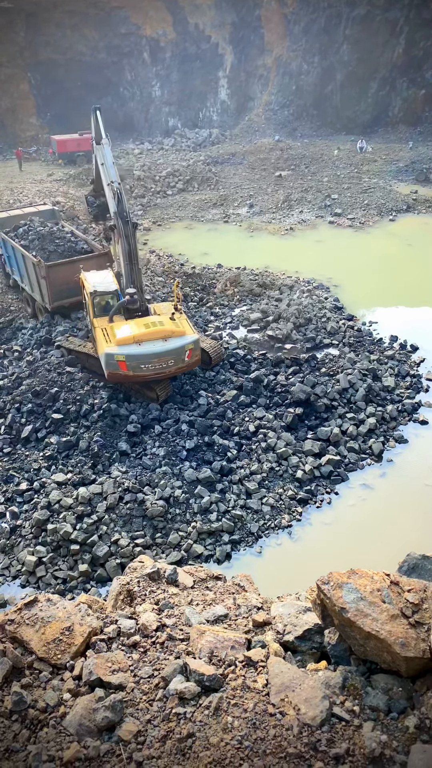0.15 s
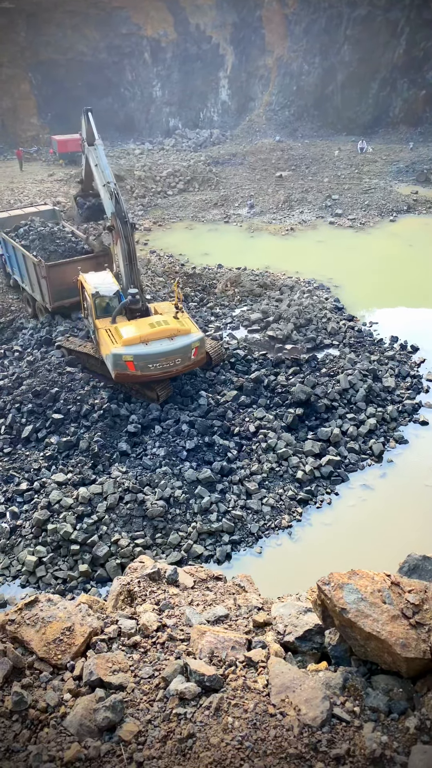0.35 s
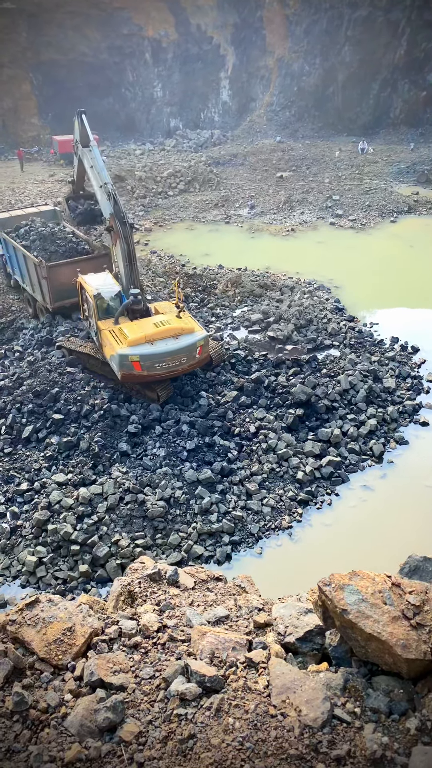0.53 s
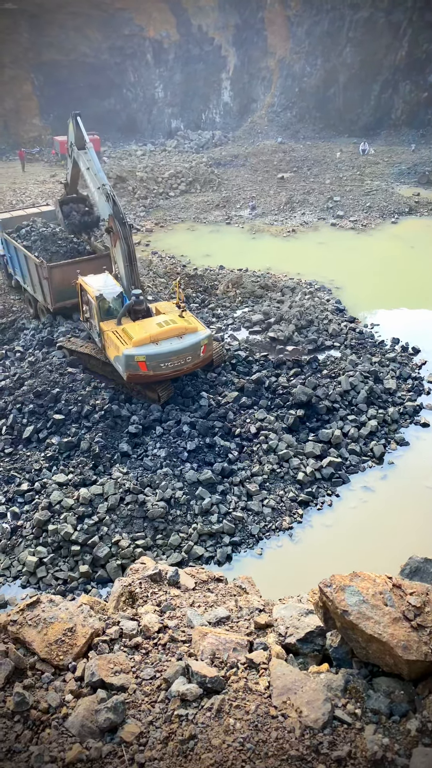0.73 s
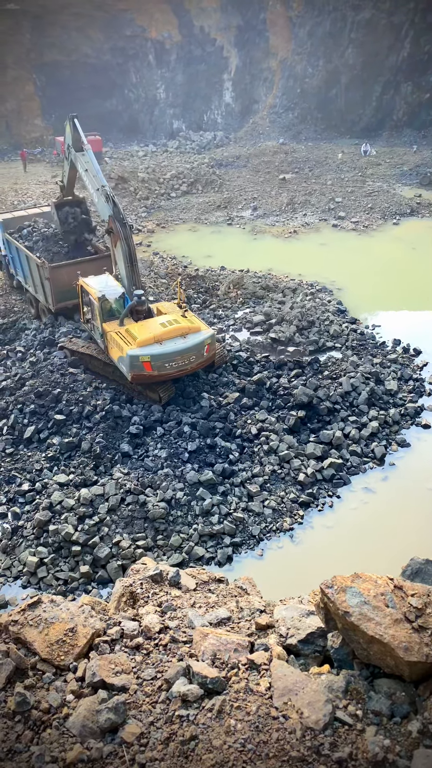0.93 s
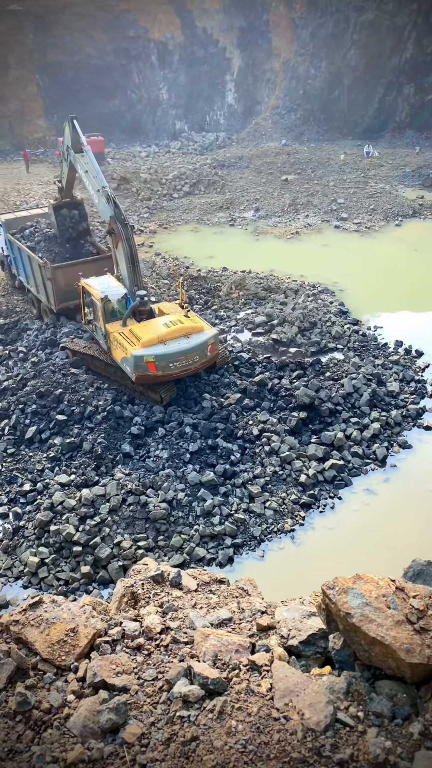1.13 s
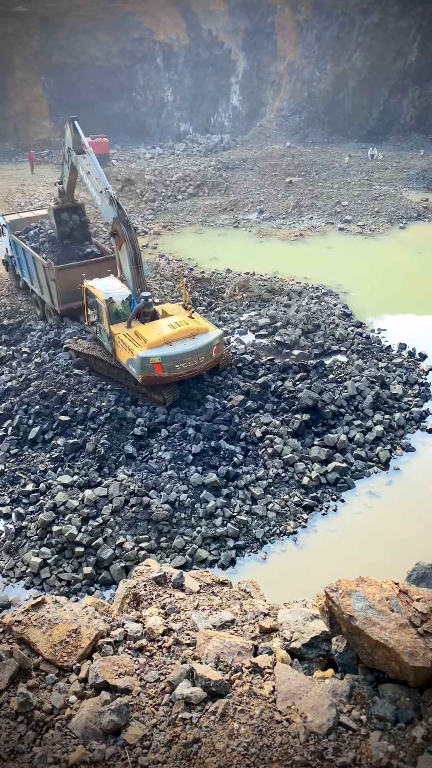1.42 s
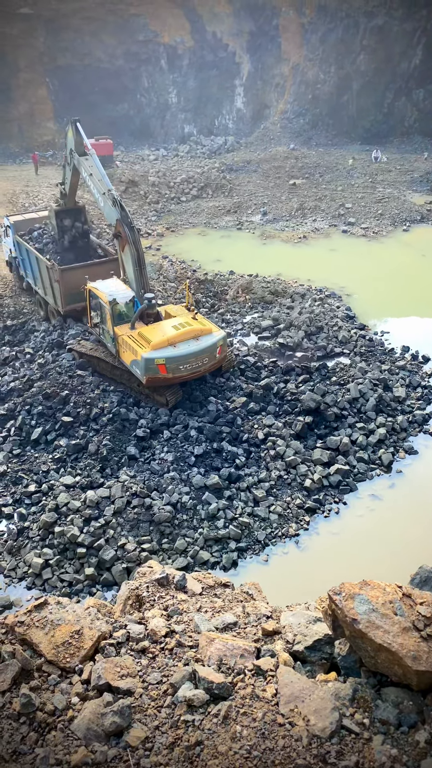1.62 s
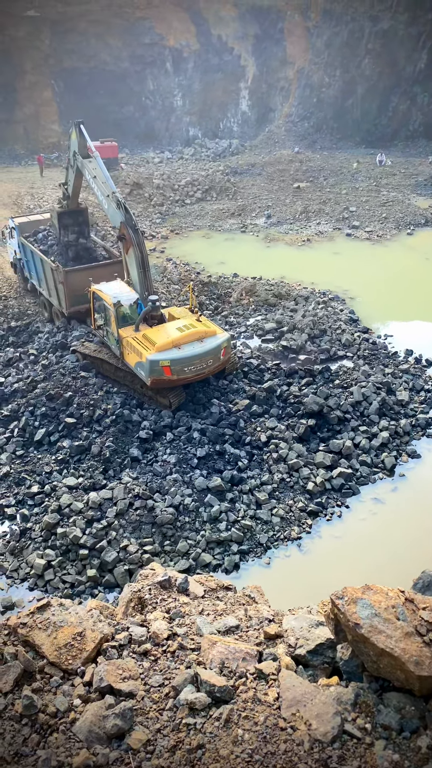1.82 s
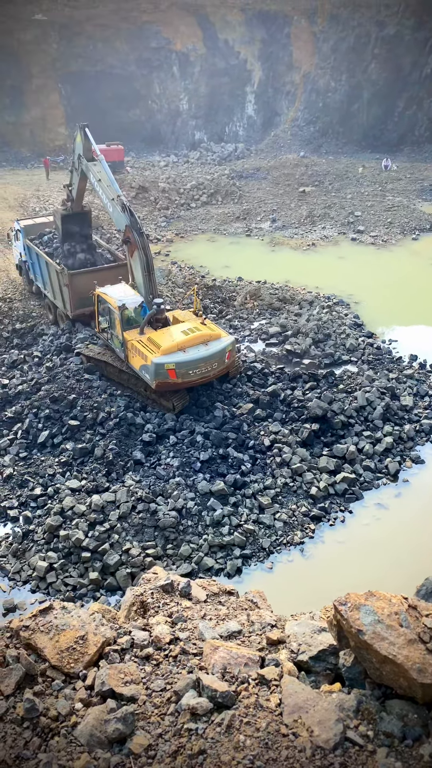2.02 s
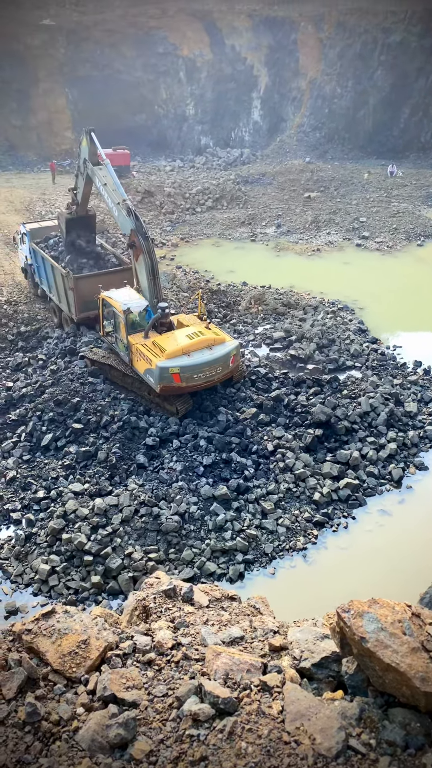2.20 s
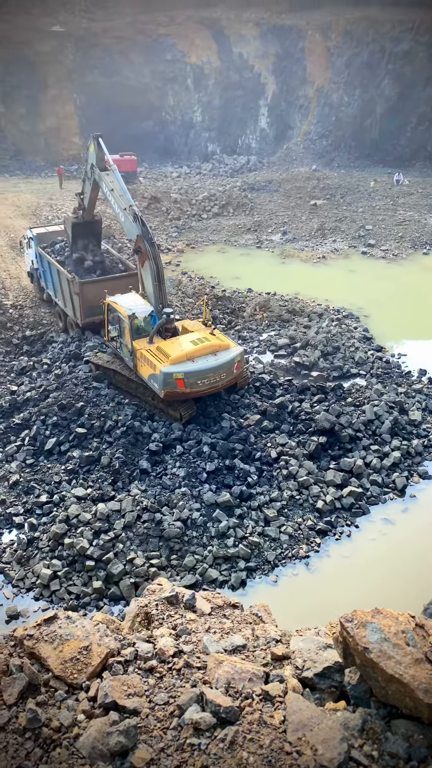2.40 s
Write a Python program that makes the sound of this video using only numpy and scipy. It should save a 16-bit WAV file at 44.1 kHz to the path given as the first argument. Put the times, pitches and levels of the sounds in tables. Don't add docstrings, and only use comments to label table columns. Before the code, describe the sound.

Steady rough engine rumble and hydraulic hiss from an excavator in an open quarry; a few hard knocks on hollow steel, then stones pour in faster with booms and grit, heard at some distance on a phone.

```python
import sys
import numpy as np
from scipy import signal
from scipy.fft import rfft, irfft, next_fast_len
from scipy.io import wavfile
from scipy.ndimage import uniform_filter1d

SR = 44100
rng = np.random.default_rng(int(sys.argv[2]) if len(sys.argv) > 2 else 0)


def master(y):
    cut = np.clip(np.atleast_2d(y).T, -1, 1)
    pcm = np.round(cut * 32767)
    wavfile.write(sys.argv[1], SR, pcm.astype(np.int16))


def to_linear_factor(level_db):
    exponent = np.asarray(level_db, float) / 20
    return 10 ** exponent


N = 112455


def curve(table, x, col=1):
    a = np.array(table, float)
    return np.interp(x, a[:, 0], a[:, col])


def logf(table, hz):
    a = np.array(table, float)
    return np.interp(np.log(hz + 1), np.log(a[:, 0] + 1), a[:, 1])


def level(x, db):
    return x * to_linear_factor(db) / np.sqrt(np.mean(x ** 2))


def band(x, hz, width):
    return signal.lfilter(*signal.iirpeak(hz, hz / width, SR), x)


def wide_band(x, hz, width):
    return band(band(x, hz, width), hz, width)


def walk(rate):
    k = int(SR / rate)
    steps = np.repeat(rng.standard_normal(N // k + 1), k)
    return 1.3 * uniform_filter1d(uniform_filter1d(steps, k), k)[:N]


def sine(hz, t):
    return np.sin(2 * np.pi * hz * t)


def wavering(hz):
    return np.sin(2 * np.pi * np.cumsum(hz) / SR)


def fade(t, t60):
    return np.exp(-np.log(1000) * t / t60)


def add(out, t0, x):
    i = int(t0 * SR)
    out[i:i + len(x)] += x[:max(N - i, 0)]


# [f/Hz, width/Hz, level/dB]
EXHAUST = [(45, 91, -5), (83, 28.3, 6), (186.5, 16.7, -11), (272.6, 43, -2.5), (424, 113, -7),
           (700, 140, -11.5)]
# [f/Hz, level/dB]
WHINES = [(461, -43.5), (1098, -56.5), (4899, -62)]


def engine():
    firing_hz, firing_db = 88.5, -27
    pump = (230.2, -30)  # Hz, dB
    sag_db_s = -1
    turns = np.cumsum(firing_hz * (1 + .025 * walk(5) + .05 * walk(60))) / SR
    size = to_linear_factor(3.56 * rng.standard_normal(N // 100))
    pulses = np.diff(np.floor(turns), prepend=0) * size[turns.astype(int)]
    exhaust = np.zeros(N)
    for k, (hz, width, db) in enumerate(EXHAUST):
        exhaust += (-1) ** k * to_linear_factor(db) * band(pulses, hz, width)
    out = level(exhaust, firing_db)
    for hz, db in [pump, *WHINES]:
        loudness = to_linear_factor(db + 2.5 + 1.03 * walk(8.74) + sag_db_s * np.arange(N) / SR)
        out += loudness * wavering(hz * (1 + 0.00607 * walk(6)))
    return out


# [f/Hz, level/dB per Hz]
DRONE = [(30, -11.5), (55, -0.5), (250, -7), (550, -20), (2300, -20.5), (4400, -31), (9500, -38),
         (15000, -60.5)]


def drone():
    load_db_s, load_hz = 1.35, 1500
    out, swell = 0, walk(6.76)
    for hz in 28 * 2 ** (np.arange(28) / 3.02):
        db = logf(DRONE, hz) + 0.12 * swell + 0.5 * walk(13.72)
        if hz > load_hz:
            db = db + load_db_s * (np.arange(N) / SR - 1.5)
        out = out + to_linear_factor(db) * wide_band(rng.standard_normal(N), hz, hz / 3)
    return level(out, -23.5)


def hydraulics():
    swing_hz, swing_db, swing_fade_db_s = 703, -36, -16
    valve_s, valve_width_s, valve_db = 1.268, 0.087, -36.5
    t = np.arange(N) / SR
    loudness = to_linear_factor(swing_db + swing_fade_db_s * t + 2.5 * walk(29))
    tone = loudness * wavering(swing_hz * (1 + 0.006 * walk(31)))
    hiss = level(band(rng.standard_normal(N), 2700, 3700), valve_db)
    return tone + hiss * np.exp(-((t - valve_s) / valve_width_s) ** 2)


# [t/s, level/dB]
SLIDE = [
    (0, -39),
    (1.15, -35),
    (1.5, -25.5),
    (1.9, -22.5),
    (2.15, -21),
    (2.38, -24.5),
    (2.44, -23),
    (2.475, -14.5),
    (2.55, -21),
]


def slide():
    grains_per_s, middle_hz, scatter_db = 900, 600, 1.5
    out = np.zeros(N)
    for when, v, w, s in rng.random((int(grains_per_s * 2.55), 4)):
        spread = v + s - 1
        hz = middle_hz * 2 ** (2.4 * max(spread, .6 * spread))
        t = np.arange(int(SR * 5 / hz)) / SR
        size = to_linear_factor(-scatter_db * np.log(w + 0.11) - 1.4 * np.log2(hz / middle_hz))
        add(out, when * N / SR, size * fade(t, 5.35 / hz) * sine(hz, t))
    return level(out, -3) * to_linear_factor(curve(SLIDE, np.arange(N) / SR))


# [t/s, level/dB, f/Hz]
THUDS = [(0.1, -20, 220), (0.024, -13, 238), (1.802, -12.5, 450), (0.37, -6, 350), (0.38, -7, 265),
         (0.46, -17, 210), (0.45, -11.5, 294), (0.49, -11, 250), (0.899, -14, 88), (1.941, -10.5, 374),
         (2.09, -11, 256), (1.995, -16, 222), (2.035, -16, 203), (2.065, -11.5, 175), (1.87, -17, 160),
         (1.78, -14.5, 144), (1.96, -14, 170), (2.455, -12, 166), (0.11, -12, 236), (0.2, -16.5, 239),
         (2.16, -11, 260), (2.2, -13.5, 173), (2.401, -13.5, 230), (2.436, -13, 260), (2.47, -5, 300),
         (2.505, -9.5, 168), (1.585, -13.5, 224), (2.268, -11.5, 254)]
# [t/s, level/dB, f/Hz]
CONTACTS = [(0.352, -18, 1077), (0.356, -20, 1980), (2.497, -17, 2260), (2.512, -16.5, 1880),
            (1.512, -17, 667), (2.07, -17.5, 1590), (0.336, -22.5, 4940), (0.344, -33, 1940),
            (0.854, -18, 2950), (0.8578, -14.5, 1880), (0.858, -18, 3000), (0.858, -20, 916),
            (0.864, -30, 2560), (1.441, -24, 1780), (2.453, -23, 2620), (2.486, -8, 764), (2.487, -18, 1760),
            (2.471, -15, 1385)]
# [t/s, level/dB, f/Hz]
BANGS = [(0.3354, -8, 1100), (0.3354, -10, 1950), (0.3358, -13, 1500), (0.3355, -14, 750), (0.342, -8, 220),
         (0.345, -12, 170), (0.174, -15, 700), (0.1745, -17, 570), (0.343, -15, 1950), (0.3445, -16, 1150),
         (0.338, -15, 1500), (1.3943, -14, 2050), (1.3946, -18, 1700), (1.3946, -18, 2450),
         (1.408, -20, 2050), (1.4415, -19, 1850), (2.452, -19, 2300), (2.461, -18, 1700)]


def thuds_and_pings():
    out, t = np.zeros(N), np.arange(SR // 2) / SR
    for t0, db, hz in [*THUDS, *CONTACTS, *BANGS]:
        onset = np.minimum(t * hz / 1.1, 1)
        add(out, t0, to_linear_factor(db) * onset * fade(t, 14 / hz + 0.027) * sine(hz, t))
    return out


# [t/s, level/dB, f/Hz, t60/s]
GRIT = [(0.1725, -42, 9900, .05), (0.3346, -42, 10550, .1), (1.04, -40, 9700, .05),
        (1.6496, -37, 11000, .06), (1.8677, -39, 9800, .05), (1.9131, -39, 9070, .04),
        (2.0822, -40, 9100, .04), (2.2388, -41.5, 9500, 0.12), (2.4538, -35, 10000, .05),
        (0.3352, -28.5, 4300, 0.15), (0.344, -19, 1900, 0.082), (0.853, -21, 2800, 0.16),
        (0.862, -35, 5200, 0.1), (1.3952, -30, 2200, .06), (0.7243, -32, 2930, 0.088),
        (1.0457, -26.5, 2400, 0.087), (1.0755, -28, 2600, 0.08), (1.1892, -28, 2290, 0.066),
        (1.5834, -34, 2300, 0.054), (1.9799, -30, 2600, 0.067), (2.2523, -25.5, 2700, 0.072),
        (2.3022, -28, 2600, 0.13), (2.3545, -26, 2410, 0.068), (2.41, -29.5, 3800, .1),
        (0.174, -32, 620, 0.066), (2.458, -25, 2600, 0.18), (2.487, -24, 2500, .2), (0.866, -30, 3550, .15),
        (0.337, -18, 750, 0.083), (1.942, -27, 700, .08)]


def grit():
    out, t = np.zeros(N), np.arange(SR // 4) / SR
    for t0, db, hz, t60 in GRIT:
        noise = rng.standard_normal(len(t))
        spray = wide_band(noise, hz, 0.51 * hz)
        add(out, t0, level(spray, db) * fade(t, t60))
    return out


# [t/s, crack level/dB, stone f/Hz, bed boom relative level/dB, bright clatter relative level/dB]
KNOCKS = [(0.175,-25,715,-9,-31), (0.336,-8,1270,-0.5,-8.5), (0.413,-14.5,501,-7.5,-7),
          (0.852,-15.5,1920,-17,-17), (0.857,-11,1350,-11,-1.5), (0.931,-18,640,-14,1),
          (1.317,-15,1170,-34,-13), (1.3956,-13.5,1920,-18,-9.5), (1.442,-19.5,1800,-16,-12),
          (1.509,-11.5,650,-25,-11), (1.577,-13,940,-14,-13), (1.72,-14.5,600,-6,-25),
          (1.764,-15,845,-10,-11), (1.866,-15,650,-10,-8.5), (1.945,-9.5,620,-5.5,-14),
          (2.047,-13.5,556,-4.5,-7), (2.073,-14,620,-9,-13), (2.135,-13.5,577,-16,-14),
          (2.16,-13.5,760,-19,-12), (2.239,-13.5,905,-27,-13), (2.285,-11.5,720,-12,-9.5),
          (2.452,-13.5,1050,-5.5,-2.5), (2.486,-9.5,880,-5.5,-12.5), (2.502,-11.5,900,-10,-16)]
# [f/Hz, level/dB, t60/s]
BED = [(83.5, 2, 0.3), (122, 3, 0.056), (187, -0.5, 0.088), (234.7, -3.5, 0.27), (263.3, 1, 0.36),
       (324, -5, 0.12), (388, 1, 0.2), (685, -6.5, 0.067), (1118, -14, 0.1)]


def bed_ring(t):
    out = np.zeros(len(t))
    for hz, db, t60 in BED:
        a, b = rng.standard_normal(2)
        tone = np.sin(2 * np.pi * hz * (1 + 0.021 * b) * t + 3 * b)
        out += to_linear_factor(db + 1.7 * a) * fade(t, t60) * tone
    return out


def knocks():
    crack_t60_s, bed_late_s = .03, .006
    rattle_db, rattle_hold_s, rattle_t60_s = -6, .032, .12
    hard_db, rattle_per_db = 1, 0.31
    out, t = np.zeros(N), np.arange(SR // 2) / SR
    rattle_fade = fade(np.maximum(t - rattle_hold_s, 0), rattle_t60_s)
    for t0, db, hz, boom_db, bright_db in KNOCKS:
        noise = rng.standard_normal((3, len(t)))
        rattle = to_linear_factor(rattle_db + rattle_per_db * min(db - hard_db, 0)) * rattle_fade
        shape = np.minimum(t * hz / 1.6, 1) * (fade(t, crack_t60_s) + rattle)
        stone = level(wide_band(noise[0], hz, 0.88 * hz), 0)
        clatter = level(wide_band(noise[1], 2280, 2000), 0)
        clatter = clatter + level(band(noise[2], 6000, 2200), -12)
        add(out, t0 - .001, to_linear_factor(db - 9.5) * (stone + to_linear_factor(bright_db + 5) * clatter) * shape)
        boom = bed_ring(t) * np.minimum(t / 0.0021, 1)
        add(out, t0 + bed_late_s, to_linear_factor(db + boom_db - 4.5) * boom)
    return out


# [t/s, level/dB, f/Hz]
SHOVES = [(1.476, -8, 56), (1.52, -10.5, 61.5), (1.638, -8, 67), (1.708, -5, 85), (0.41, -6, 83),
          (1.29, -12, 55), (0.35, -13, 115), (0.839, -17, 85.5), (0.908, -12, 70), (0.944, -17, 60),
          (1.22, -11.5, 55), (1.44, -16, 91), (2.2, -10.5, 86), (2.262, -11.5, 85), (2.43, -9, 89),
          (2.468, -10, 86), (2.494, -9, 91), (2.515, -12, 170), (0.215, -20, 77), (0.28, -22, 80),
          (1.86, -11, 70), (2.015, -14.5, 74.5)]


def shoves():
    out, t = np.zeros(N), np.arange(SR // 2) / SR
    for t0, db, hz in SHOVES:
        add(out, t0, -to_linear_factor(db) * fade(t, 6.4 / hz) * sine(hz, t))
    return out


def smear(x, tail):
    return signal.fftconvolve(x, tail / np.linalg.norm(tail))[:N]


def scene():
    face_t60_s, face_db = 0.48, -15.5
    rocks = slide() + thuds_and_pings() + knocks() + shoves()
    t = np.arange(SR // 2) / SR
    echo = band(rng.standard_normal(len(t)), 760, 2170)
    echo = echo * fade(t, face_t60_s) * np.minimum(t / 0.022, 1)
    near = engine() + hydraulics() + rocks + to_linear_factor(face_db) * smear(rocks, echo)
    scatter = rng.standard_normal(len(t)) * fade(t, 0.062)
    spray = grit()
    mid = near + drone() + spray
    side = smear(near, scatter) + drone() + smear(spray, scatter)
    return np.array([mid + side, mid - side])


def top_cut(x):
    return signal.sosfilt(signal.butter(12, 15740, fs=SR, output="sos"), x)


# [f/Hz, phase/radians]
PORT_PHASE = [(0, 0), (550, .6), (900, 0), (1650, -.1), (2900, 2.1), (3700, 2.9), (4400, 3.4), (5000, 6.4),
              (6000, 7.9), (6700, 9.3), (7700, 9.5), (9800, 12.55), (11500, 12.6), (12700, 15.6),
              (14500, 15.75), (15600, 17.2)]
# [f/Hz, level/dB]
PORT_BALANCE = [(60, -.4), (230, -.8), (380, -3), (520, 0), (800, 9), (1250, 5.5), (1700, 0), (3300, 2.5),
                (4650, -5), (5500, -.5), (7000, 0)]
# [f/Hz, level/dB]
PORT_LOOSE = [(100, -22), (300, -20.5), (750, -1), (1700, -13.5), (3300, -9), (4500, -3.5), (5400, -34),
              (7200, -14.5), (8800, -12), (10400, -7), (12100, -29), (13600, -17)]


def record(dry):
    n = next_fast_len(N + 4096)
    hz = np.arange(n // 2 + 1) * SR / n
    low_cut = hz ** 5 / (hz ** 5 + 36 ** 5)
    mid = rfft((dry[0] + dry[1]) / 2, n) * low_cut
    side = rfft((dry[0] - dry[1]) / 2, n) * to_linear_factor(logf(PORT_LOOSE, hz)) * low_cut
    port = to_linear_factor(logf(PORT_BALANCE, hz) / 2) * np.exp(.5j * curve(PORT_PHASE, hz))
    left = irfft((mid + side) * port, n)[:N]
    right = irfft((mid - side) / port, n)[:N]
    x = np.array([left, right])
    x = x / (1 + np.abs(x / .95) ** 6) ** (1 / 6)
    return top_cut(x)


dry = scene()
out = record(dry)
master(out)
```